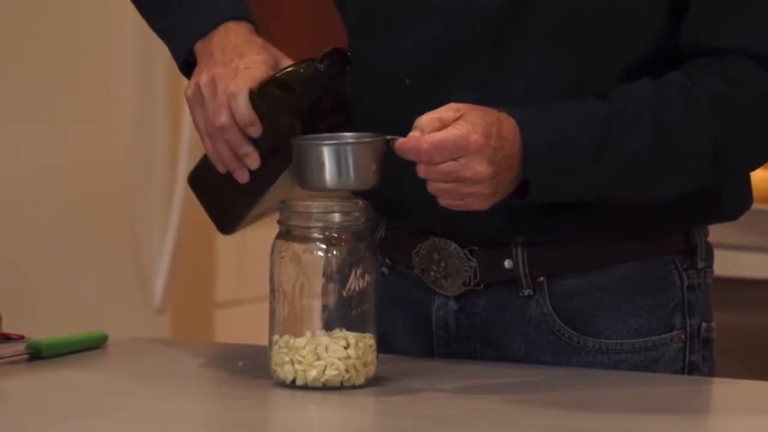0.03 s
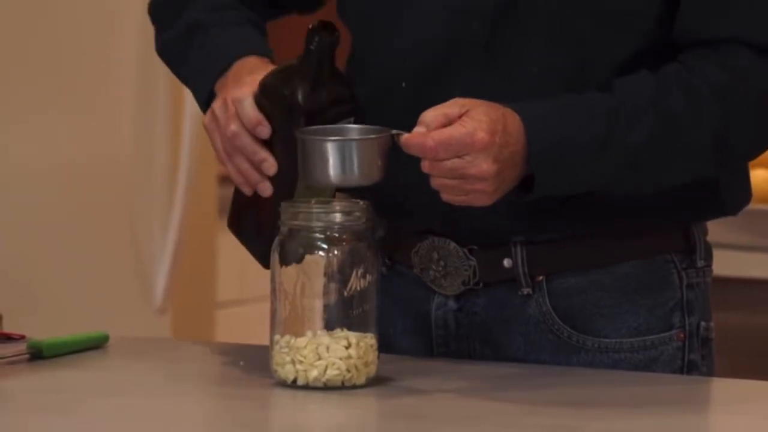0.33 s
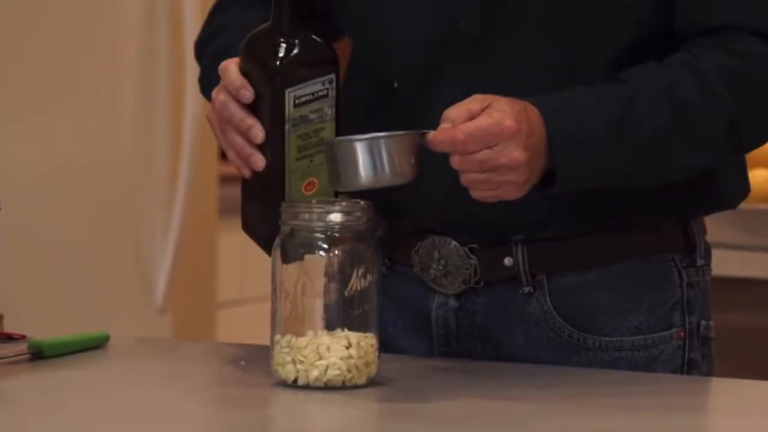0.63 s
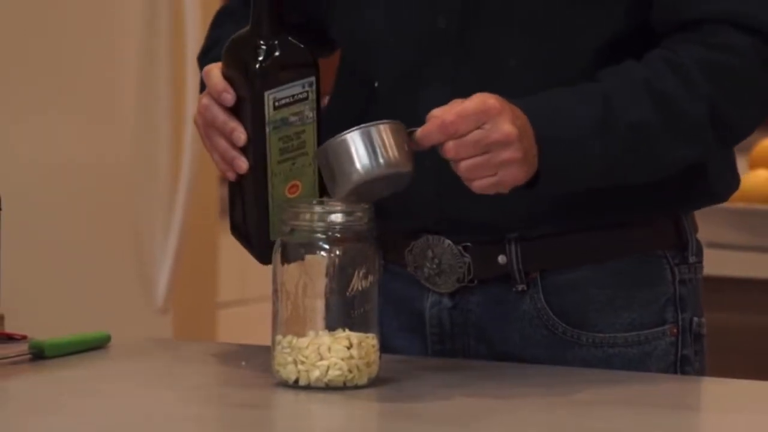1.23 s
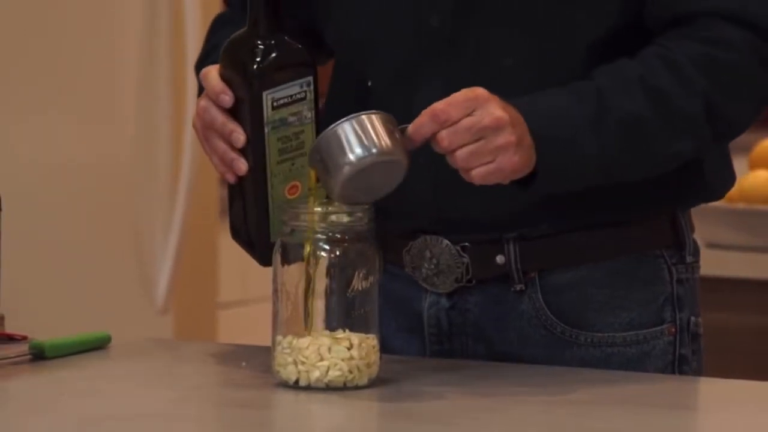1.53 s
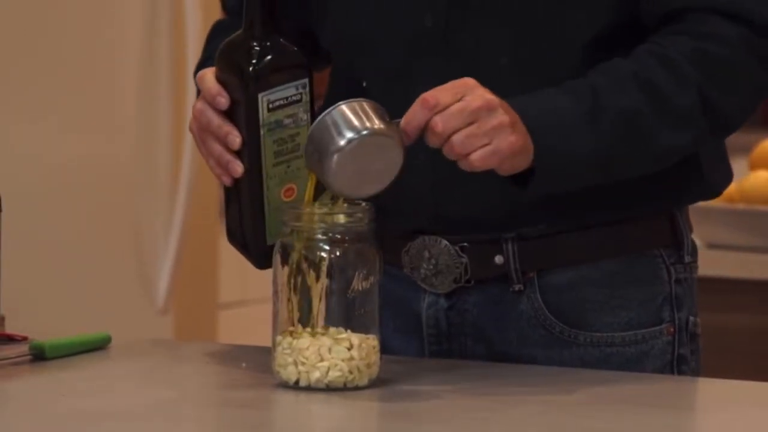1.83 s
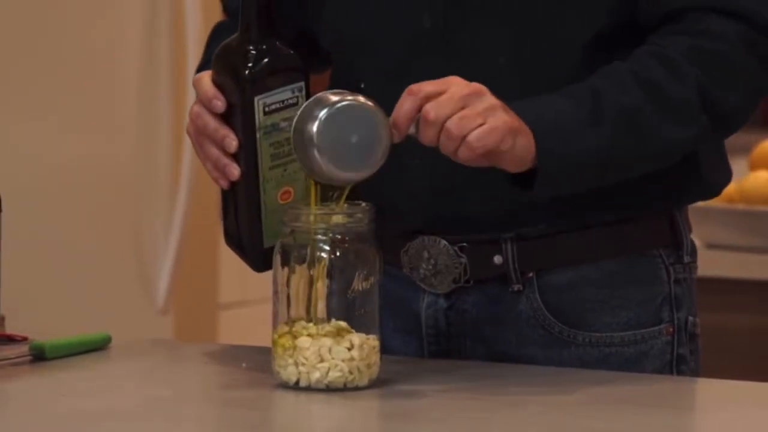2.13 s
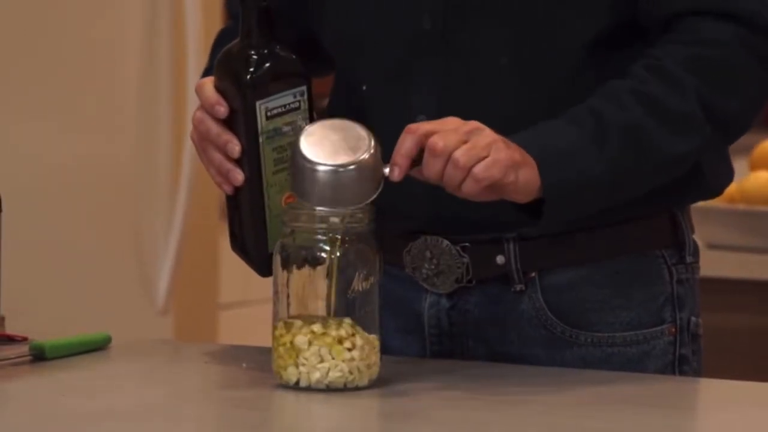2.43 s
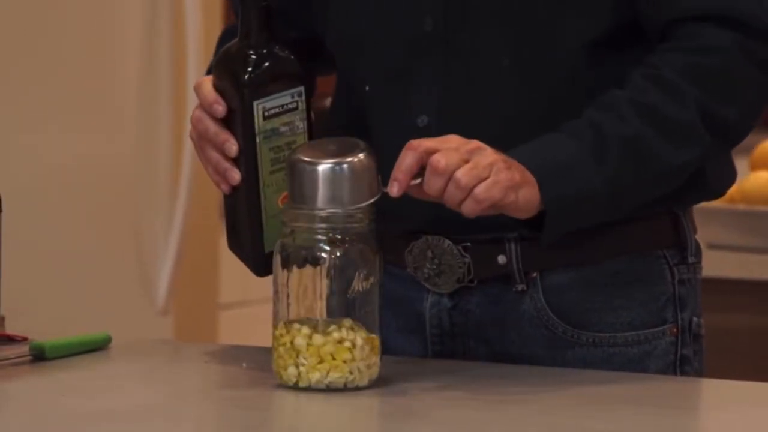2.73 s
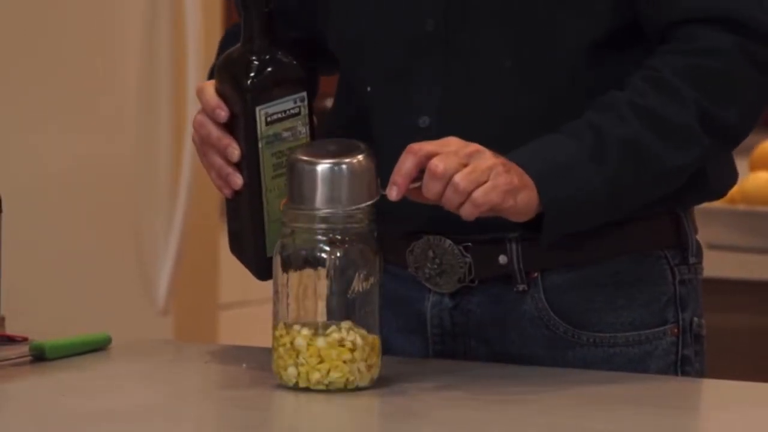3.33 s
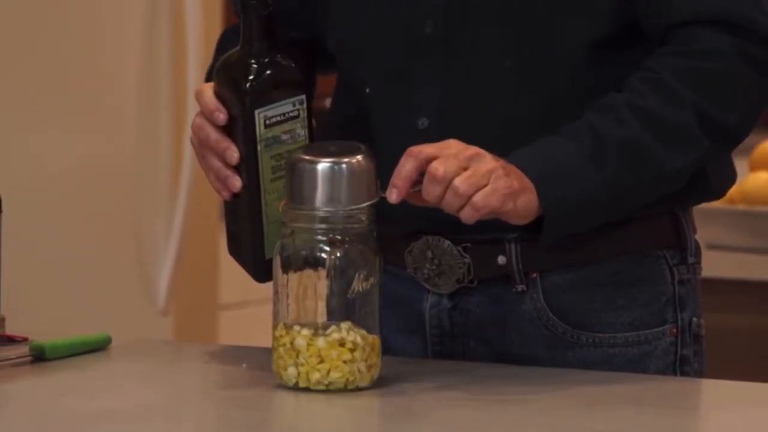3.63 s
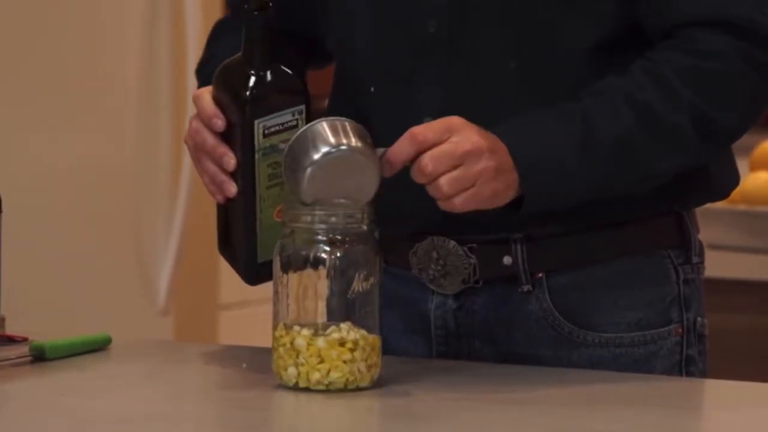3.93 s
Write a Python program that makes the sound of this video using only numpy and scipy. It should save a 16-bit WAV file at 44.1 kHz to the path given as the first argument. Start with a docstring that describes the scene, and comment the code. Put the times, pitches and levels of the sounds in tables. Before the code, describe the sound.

A steel measuring cup clinks against a glass bottle at 0.8 and 1.1 seconds, over faint kitchen ventilation. From about 1.8 to 2.5 seconds oil pours into a jar with soft, low plops and a faint hiss. The cup clinks onto the rim at 2.5 and 2.7 seconds. Around 3.8 seconds glass knocks loudly on the counter while the cup scrapes the rim with a rough ringing.

```python
"""In a quiet kitchen, ventilation hums. A steel measuring cup taps a glass oil bottle twice, then tips
its oil onto garlic in a jar with a faint hiss and soft, low plops. The cup is laid upside down on the
jar's rim with two clinks. At the end the glass knocks down on the counter while the cup scrapes on the
rim, catching and slipping so that it sings. Each hit is a short clack, the ringing of the struck object
and a thump from the counter below. The sound is mono."""
import sys
import numpy as np
from scipy import signal
from scipy.fft import rfft, irfft, next_fast_len
from scipy.io import wavfile
from scipy.ndimage import map_coordinates

SR = 44100
rng = np.random.default_rng(int(sys.argv[2]) if len(sys.argv) > 2 else 0)


def wav_record(signal):
    """Record a signal, one row per channel, as 16-bit PCM in the file named by sys.argv[1]."""
    frames = np.transpose(np.atleast_2d(signal))
    bounded = np.clip(frames, -1, 1)
    # unit amplitude maps onto the largest positive 16-bit level
    quanta = np.round(bounded * 32767).astype(np.int16)
    wavfile.write(sys.argv[1], SR, quanta)


N = 176400

# The hits. Each row: start in seconds, ring in dB, clack in dB, brightness in dB per octave, thud in dB,
# knock pitch in Hz, knock in dB, knock fade in seconds, counter flex in dB, the pitch that the contact
# point favours in Hz, its boost in dB. A fade time (t60) is how long a sound takes to drop 60 dB.
BOTTLE_TAPS = [(.8402, 0.5, -39.5, -0.5, -43, 714, -47, 0.25, -48.5, 8200, 5.5),
               (1.1076, -0.5, -41.5, -0.5, -44, 519, -44, 0.23, -49, 3675, 10)]
RIM_CLINKS = [(2.4654, 0.5, -30, 0.5, -48.5, 327, -38, 0.074, -42, 1260, 0.64),
              (2.6583, -13, -39, -3.5, -53.5, 449, -28.5, 0.044, -53, 1281, 3.4),
              (2.6655, -12.5, -40.5, -2.5, -56, 465, -43.5, 0.18, -53, 1940, 10.3)]
SET_DOWNS = [(3.8203, 0, -24.5, 0, -32.5, 507.5, -22, 0.12, -33, 2912, 2.4)]
# The tones each object rings with. Each row: pitch in Hz, level in dB, fade time in seconds.
BOTTLE_TONES = [(1516, -45.5, 0.16), (1992, -45.5, 0.47), (2260, -60, 0.12), (3675, -71, .36),
                (4230, -71, 0.15), (4980, -69.5, 0.2), (6140, -70, 0.19), (8360, -55.5, 0.079),
                (9360, -51, 0.067), (10480, -55.5, .07), (11300, -57, 0.08), (11800, -60, .1),
                (12900, -55, .07), (15090, -63, 0.065)]
CUP_TONES = [(657, -39.5, 0.22), (1293, -47.5, 0.34), (1934, -61, 0.38), (2393, -51, 0.34),
             (4030, -52, 0.13), (4550, -58, 0.2), (5012, -62, 0.33), (5170, -65, 0.48), (7960, -77, .15),
             (8870, -55, 0.3), (9297, -57, 0.22), (9900, -63, 0.42), (10680, -66, 0.18), (12910, -58, .16)]
GLASS_TONES = [(987, -37.5, 0.26), (1256, -43, 0.27), (2000, -40, 0.22), (2920, -39.5, 0.053),
               (8400, -38, 0.053), (8900, -43, 0.093), (9860, -43, 0.051), (10770, -46, 0.045),
               (13020, -48, 0.074), (13580, -45, .06), (14600, -45, .03)]
COUNTER_TONES = [(73, -18, 0.23), (139.2, -12, 0.38), (285.3, 1, 0.18), (330.4, -4.5, 0.14),
                 (420.3, 2, 0.21), (515, -3.5, .23), (714, -10, .2)]
# The colour of each noise. Each row: frequency in Hz, relative strength there in dB.
AIR_NOISE = [(25, -16.5), (44, -2), (91, -3.5), (122, 2), (209, -7.5), (240, -5), (378, -10), (509, -9),
             (570, -15), (830, -14), (960, -20.5), (1170, -21.5), (2500, -30.5), (4870, -34.5),
             (13500, -37.5), (15500, -44)]
POUR_HISS = [(1000, -2), (3000, -11), (5000, -5.5), (7200, -6), (10000, -5), (14000, -17)]
POUR_RUMBLE = [(25, 1), (55, 7.5), (130, -5.5), (300, -10.5), (900, -54.5)]
BOTTLE_CLACK = [(100, 1), (300, 4), (700, 7.5), (1200, -10), (1600, -4), (2300, -26), (3000, -26),
                (6500, -28), (8300, -16), (9700, -23), (12500, -15), (15500, -28)]  # a clack is many crowded tones that die quickly
CUP_CLACK = [(100, 7.5), (300, 2.5), (800, -20), (1250, 6.5), (1600, -13.5), (2200, -11), (3200, -15.5),
             (4000, -1), (5200, -6), (6800, -23.5), (9200, -8.5), (11500, -14.5), (15500, -21)]
GLASS_CLACK = [(60, -4), (200, -8), (450, 9), (800, -6), (1300, -5), (2000, -21.5), (2600, -21.5),
               (4500, -26), (7300, -32), (8600, -24.5), (12000, -21), (13200, -18), (15500, -27)]
THUD_NOISE = [(30, -34), (100, -10), (200, -9.5), (400, 5.5), (650, -2.5), (1000, -11.5), (2000, -6.5),
              (4000, -61)]
FLEX_NOISE = [(20, 0), (35, 0), (50, -9), (72, 4), (100, -7), (180, -14), (320, -6), (500, -19),
              (1000, -66)]  # the counter's low bending
RUB_NOISE = [(80, -4), (250, -4), (460, 7), (800, -3.5), (1300, -10.5), (2000, -11), (2700, -30),
             (5000, -26.5), (7500, -34), (9500, -29), (15500, -33)]
# Held tones of the fan and the rubbed cup. Each row: pitch in Hz, relative level in dB.
FAN_TONES = [(134, -3.5), (430, -16.5), (764, -10.5), (825, -3), (883, -11)]
RUB_TONES = [(1270, 1.5), (1986, -1), (2455, -2), (3198, -1.5), (3650, -0.5), (5103, -0.5), (5448, -11),
             (6842, -1), (7080, -15), (8753, -7), (9100, -4), (10869, -11), (11246, -4.5), (13135, -5)]
# Plops as the oil moves. Each row: start in seconds, level in dB, pitch in Hz.
PLOPS = [(0.051, -41.5, 46.3), (1.839, -41.5, 64), (1.884, -35, 89), (1.901, -38, 45), (1.933, -41, 63.6),
         (2.011, -39, 60.5), (2.024, -48.5, 175), (2.04, -48, 45), (2.089, -46, 64), (2.201, -47, 38),
         (2.24, -49, 148), (2.304, -44.5, 56)]
# The oil stream swelling and fading. Each row: time in seconds, level in dB.
POUR_LEVELS = [(1.6, -100), (1.85, -80), (2.05, -75.5), (2.3, -77.5), (2.5, -79.5), (2.7, -130)]
# Ticks of the cup and of drops. Each row: start in seconds, level in dB, centre pitch in Hz.
TICKS = [(1.6373, -57.5, 1620), (1.713, -67.5, 1270), (2.028, -61.5, 6860), (2.029, -56.5, 560),
         (2.240, -61, 1150), (2.332, -58, 1160), (2.332, -66.5, 4320), (2.548, -61, 11500),
         (3.2, -65.5, 12100), (3.778, -62, 4900), (3.786, -51.5, 1980), (3.787, -64, 10000)]
# The cup dragging on the rim. Each row: time in seconds, rubbing in dB, singing in dB.
SCRAPE_LEVELS = [(3.68, -92, -105), (3.72, -59.5, -97), (3.79, -53, -75), (3.815, -67, -73),
                 (3.85, -43.5, -56), (3.89, -45.5, -58.5), (3.93, -40.5, -50.5), (3.965, -46, -55),
                 (4.0, -67, -60)]
# The rim's first tone as the slide begins. Each row: time in seconds, level in dB.
RIM_TONE_LEVELS = [(3.70, -92), (3.74, -78), (3.785, -62), (3.82, -62), (3.86, -84), (3.9, -100)]
# The kitchen's echo. Each row: frequency in Hz, fade time in seconds.
ROOM_FADES = [(100, 0.84), (500, 0.79), (2000, 0.51), (4500, 0.63), (9000, 0.34), (15000, 0.24)]


def amp(db):
    """Turn decibels into a gain."""
    return 10 ** (np.asarray(db) / 20)


def unit(x):
    """Scale a sound to an average (rms) level of 1."""
    return x / np.sqrt(np.mean(x ** 2) + 1e-20)


def along(points, hz):
    """Read between the rows of a (Hz, value) table on a log frequency scale."""
    freqs, values = np.transpose(points)
    return np.interp(np.log(hz + 1), np.log(freqs + 1), values)


def gains(rows):
    """One gain curve for each dB column, silent before the first row."""
    times, *columns = np.transpose(rows)
    t = np.arange(N) / SR
    return [amp(np.interp(t, times, db)) * (t > times[0]) for db in columns]


def wobble(rate, size=N):
    """A smooth curve through `rate` random points a second."""
    points = rng.standard_normal(int(size * rate / SR) + 4)
    return map_coordinates(points, [np.arange(size) * rate / SR])


def noise(shape, size):
    """Noise of level 1 whose frequencies are weighted by shape(hz)."""
    hz = np.fft.rfftfreq(size, 1 / SR)
    return unit(irfft(shape(hz) * np.exp(2j * np.pi * rng.random(len(hz))), size))


def coloured(points, size):
    """Noise with the colour of a (Hz, dB) table."""
    return noise(lambda hz: amp(along(points, hz)), size)


def fade(t60):
    """A one-second curve that drops 60 dB every t60 seconds."""
    return amp(-60 * np.arange(SR) / SR / t60)


def add(track, start, sound):
    """Mix a sound in at a start time in seconds."""
    part = track[round(start * SR):][:len(sound)]
    part += sound[:len(part)]


def sustained(tones, flutter_db, drift):
    """Tones kept going by rubbing or airflow, each wavering in level and phase."""
    t = np.arange(N) / SR
    out = np.zeros(N)
    for hz, db in tones:
        level = amp(db + flutter_db * wobble(70))
        out += level * np.sin(2 * np.pi * hz * t + drift * wobble(120))
    return unit(out)


def ring(tones, scatter_db):
    """One second of dying tones, their levels a little different each time."""
    t = np.arange(SR) / SR
    return sum(amp(db + scatter_db * rng.normal()) * fade(t60) * np.sin(2 * np.pi * hz * t)
               for hz, db, t60 in tones)


def with_echo(sound, echo_db):
    """Add the kitchen's echo, which dies sooner in the treble."""
    hz, t, spectrum = signal.stft(rng.standard_normal(SR), SR, nperseg=256)
    decay = amp(-60 * t / along(ROOM_FADES, hz)[:, None])
    tail = signal.istft(spectrum * decay, SR, nperseg=256)[1]
    tail = tail[:SR] * (1 - fade(0.049))  # the echo swells in
    echo = signal.fftconvolve(sound, tail / np.linalg.norm(tail))[:len(sound)]
    return sound + amp(echo_db) * echo


def ventilation():
    """Air rushes steadily while the fan hums a few tones."""
    rush = amp(-63.5) * coloured(AIR_NOISE, N)
    hum = amp(-73.5) * sustained(FAN_TONES, flutter_db=0.5, drift=0.34)
    return rush + hum


def oil():
    """Moving oil makes soft, low plops; its stream hisses and rumbles faintly."""
    plops = np.zeros(N)
    for start, db, hz in PLOPS:
        add(plops, start, ring([(hz, db, 0.11)], scatter_db=0.5) * (1 - fade(0.0095)))
    flow, = gains(POUR_LEVELS)
    hiss = coloured(POUR_HISS, N) * amp(0.57 * wobble(73))
    rumble = amp(17) * coloured(POUR_RUMBLE, N)
    return plops + flow * (hiss + rumble)


def chime(tones):
    """A hand-held vessel rings: each tone wavers and beats against a quieter, slightly higher twin."""
    t = np.arange(SR) / SR
    out = np.zeros(SR)
    for hz, db, t60 in tones:
        phase = 2 * np.pi * hz * t + 0.23 * wobble(152, size=SR)
        twin_ratio = 1 + 0.0037 * (1 + rng.random())
        twin = amp(-18) * np.sin(phase * twin_ratio + 2 * np.pi * rng.random())
        out += amp(db + rng.normal()) * fade(t60) * (np.sin(phase) + twin)
    return out


def hits(rows, tones, clack_colour, crack_t60, chatter_s, chatter_t60, chatter_db, echo_db):
    """Each hit cracks, chatters briefly, rings the struck object and thumps the counter under it."""
    out = np.zeros(N)
    fading_s = np.maximum(np.arange(SR) / SR - chatter_s, 0)  # the chatter holds, then fades
    chatter_fade = amp(-60 * fading_s / chatter_t60)
    for (start, ring_db, clack_db, bright, thud_db,
         knock_hz, knock_db, knock_t60, flex_db, spot_hz, boost_db) in rows:
        struck = []
        for hz, db, t60 in tones:
            favour = np.exp(-(np.log2(hz / spot_hz) / 0.075) ** 2)  # only tones close to spot_hz
            struck.append((hz, db + bright * np.log2(hz / 2000) + boost_db * favour, t60))
        ringing = amp(ring_db) * chime(struck)
        burst = noise(lambda hz: amp(along(clack_colour, hz) + bright * np.log2(1 + hz / 1000)), SR)
        chatter = amp(chatter_db + 1.3 * wobble(286, size=SR)) * chatter_fade
        clack = amp(clack_db) * burst * (fade(crack_t60) + chatter)
        counter = ring(COUNTER_TONES, scatter_db=1.5)
        thud = amp(thud_db) * (counter + amp(-3) * coloured(THUD_NOISE, SR) * fade(0.21))
        knock = ring([(knock_hz, knock_db, knock_t60)], scatter_db=3.5)
        flex = amp(flex_db) * coloured(FLEX_NOISE, SR) * fade(0.23) * (1 - fade(0.022))
        vessel = with_echo(ringing, echo_db=-16.5) + with_echo(clack, echo_db)
        add(out, start, vessel - with_echo(thud + knock, echo_db=-15) + flex)
    return out


def bottle_taps():
    """The steel cup taps the glass bottle and makes it ring."""
    return hits(BOTTLE_TAPS, BOTTLE_TONES, BOTTLE_CLACK,
                crack_t60=0.011, chatter_s=0.02, chatter_t60=0.046, chatter_db=-9, echo_db=-7)


def ticks():
    """Light touches of the cup and of drops, each a tiny burst of noise."""
    out = np.zeros(N)
    for start, db, centre_hz in TICKS:
        band = noise(lambda hz: 1 / (1 + (np.log2((hz + 1) / centre_hz) / 0.35) ** 2), SR)
        add(out, start, amp(db) * band * fade(0.028))
    return with_echo(out, echo_db=-11)


def rim_clinks():
    """The cup rings as it lands on the jar's rim."""
    return hits(RIM_CLINKS, CUP_TONES, CUP_CLACK,
                crack_t60=0.023, chatter_s=0.0029, chatter_t60=0.14, chatter_db=-18, echo_db=-12)


def rim_scrape():
    """Steel catches and slips on the glass rim, so the cup sings with a rough voice."""
    rub_gain, sing_gain = gains(SCRAPE_LEVELS)
    rim_gain, = gains(RIM_TONE_LEVELS)
    slips = unit(amp(2.2 * wobble(260)))
    singing = sing_gain * slips * sustained(RUB_TONES, flutter_db=3.5, drift=0.51)
    rim_tone = rim_gain * sustained([(2400, 0)], flutter_db=3.0, drift=0.3)
    rubbing = rub_gain * slips * coloured(RUB_NOISE, N)
    return with_echo(rubbing, echo_db=-10.5) + singing + rim_tone


def glass_set_down():
    """The glass knocks on the counter, and both ring briefly."""
    return hits(SET_DOWNS, GLASS_TONES, GLASS_CLACK,
                crack_t60=0.045, chatter_s=0.024, chatter_t60=0.084, chatter_db=-15, echo_db=-12)


def scene():
    """All the sounds together, the same in both channels."""
    mono = ventilation() + oil() + bottle_taps() + ticks()
    mono += rim_clinks() + rim_scrape() + glass_set_down()
    return np.array([mono, mono])


def record(dry):
    """Cut away the very highest treble."""
    top_hz = 15850
    size = next_fast_len(N + SR // 2)
    hz = np.fft.rfftfreq(size, 1 / SR)
    return irfft(rfft(dry, size) / np.sqrt(1 + (hz / top_hz) ** 160), size)[:, :N]


dry = scene()
out = record(dry)
wav_record(out)
```